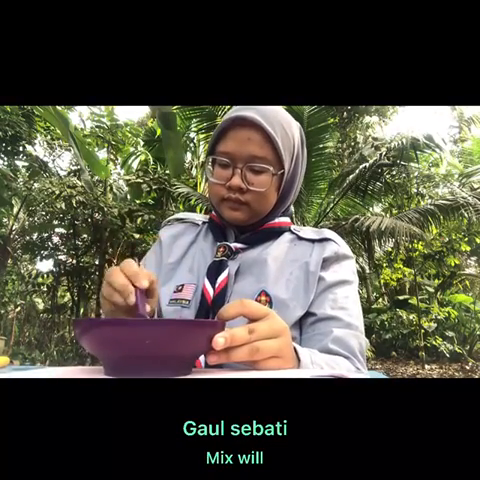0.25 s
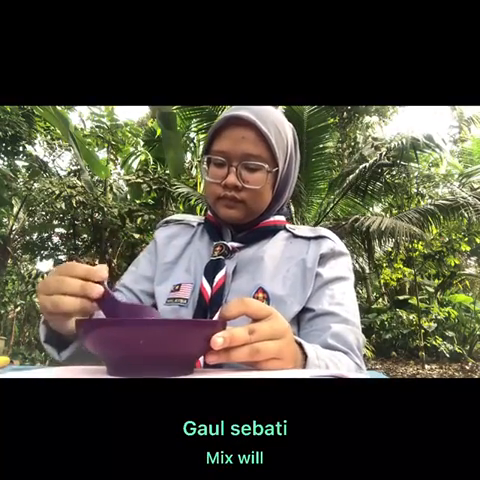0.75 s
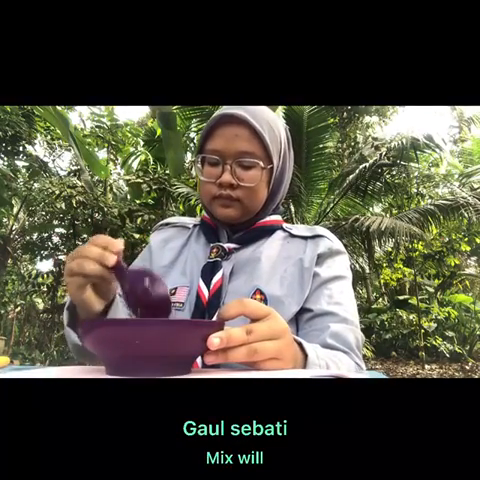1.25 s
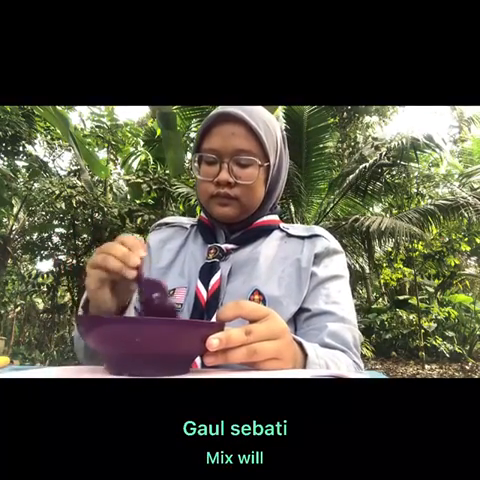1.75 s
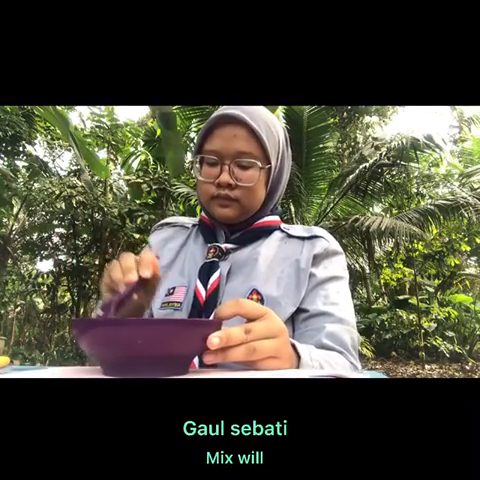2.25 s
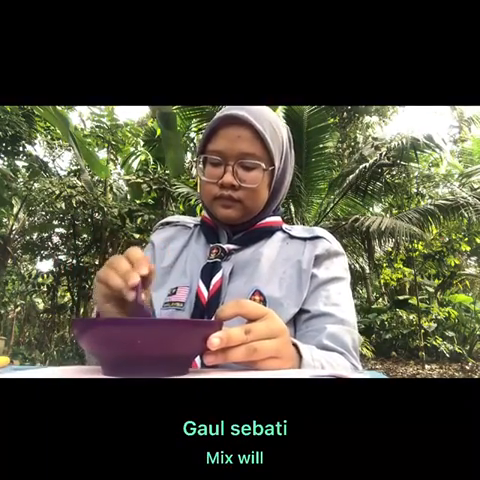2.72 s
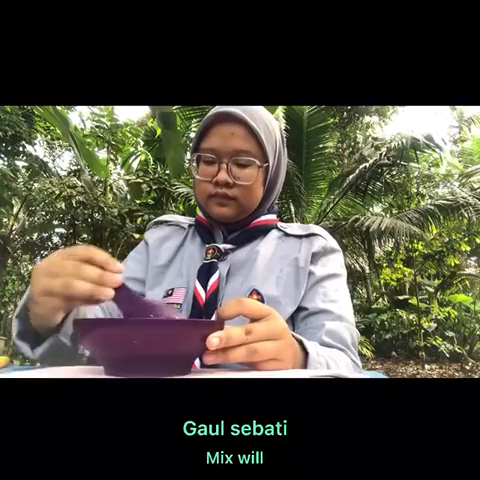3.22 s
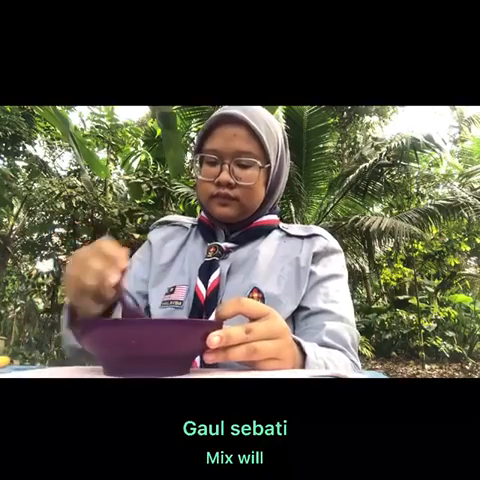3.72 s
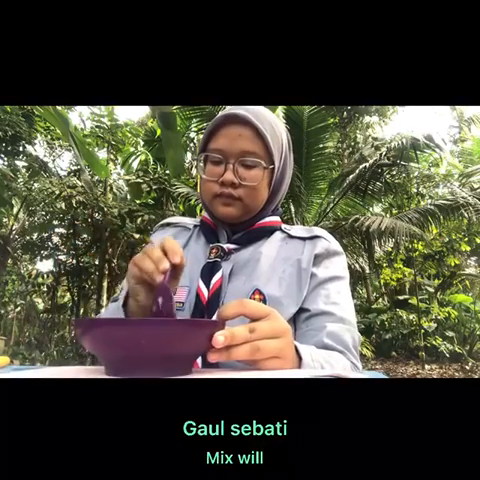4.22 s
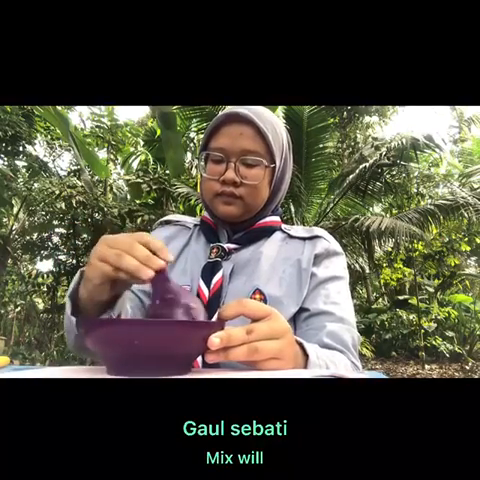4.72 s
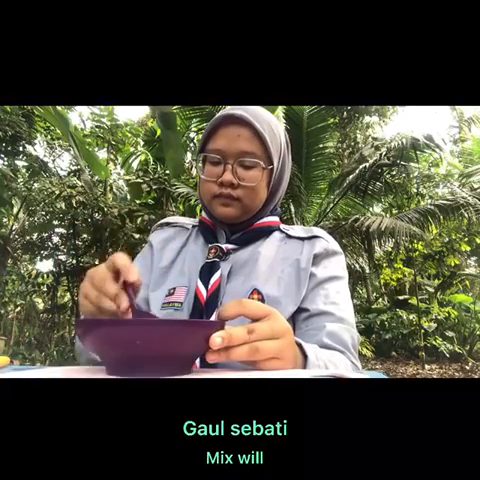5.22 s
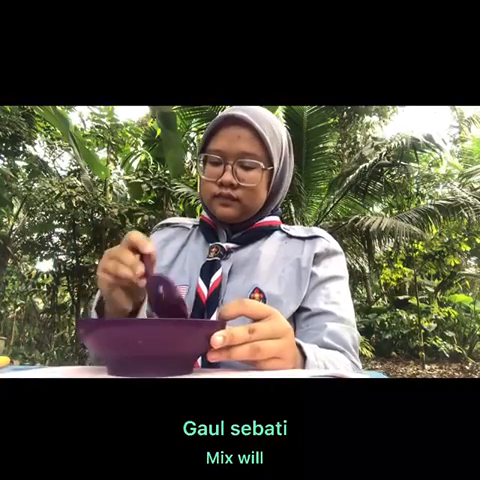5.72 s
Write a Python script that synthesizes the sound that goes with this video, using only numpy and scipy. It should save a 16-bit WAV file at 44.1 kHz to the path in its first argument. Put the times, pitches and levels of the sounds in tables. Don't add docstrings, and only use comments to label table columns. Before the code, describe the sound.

A plastic spoon stirs food in a plastic bowl outdoors with irregular hollow knocks, small clicks, short scrapes and soft table thuds.

```python
import sys
import numpy as np
from scipy import signal
from scipy.fft import rfft, irfft
from scipy.io import wavfile
from scipy.ndimage import uniform_filter1d

SR = 44100
rng = np.random.default_rng(int(sys.argv[2]) if len(sys.argv) > 2 else 0)


def materialize(psi):
    bounded = np.clip(np.atleast_2d(psi).T, -1, 1)
    quanta = np.round(bounded * 32767).astype(np.int16)
    wavfile.write(sys.argv[1], SR, quanta)


def natural_amplitude(level_db):
    exponent = np.asarray(level_db, float) / 20
    return 10 ** exponent


N = 263277

# frequency [Hz], level [dB], t60 [s].
HOLLOW = [(800, -13, .02), (980, -10, .02), (1145, 0, .04), (1260, -1, .035), (1420, -3, .03),
          (1620, -5, .02)]
WALL = [(2010, 2, 0.0045), (2290, 5, 0.0074), (2600, 4.9, 0.0081), (2897, 8.5, 0.007), (3340, 11, 0.0063),
        (3895, 4, 0.0091)]
RIM = [(4400, 3.5, 0.0079), (5270, 7, 0.0059), (6250, 8, 0.0041), (6870, 0, 0.0067), (7380, 0.5, 0.0066),
       (8320, -0.5, 0.0038)]
# frequency [Hz], level [dB], t60 [s].
TABLE = [(80.3, -28.5, 0.5), (116.7, -3.5, 0.072), (208, -2.5, 0.084), (253.8, 4, 0.081),
         (384.3, -0.5, 0.074), (461.4, -6.5, 0.053), (590.5, -11.5, 0.061), (760, -16, 0.038)]
# time [s], favoured hollow [Hz], favoured wall [Hz].
CONTACT = [(0.42, 1340, 2180), (0.55, 1280, 2750), (0.6, 1130, 3200), (0.64, 1200, 2850),
           (0.75, 1400, 2700), (1.86, 1220, 2820), (2.24, 1190, 2580), (2.98, 1400, 2600),
           (3.09, 1350, 2300), (3.13, 1234, 2730), (3.21, 1230, 2600), (4.62, 1150, 2620),
           (4.7, 1100, 2330), (4.8, 1150, 2200), (4.83, 1380, 2520), (5.42, 1350, 2100), (5.54, 1180, 2800),
           (5.93, 1360, 2320)]


def evened(x):
    return x / np.sqrt(np.mean(x ** 2) + 1e-20)


def add(mix, start_s, sound):
    part = mix[round(start_s * SR):][:len(sound)]
    part += sound[:len(part)]


def grit(per_s, spread_db):
    size = natural_amplitude(spread_db * np.minimum(rng.exponential(1, N), 4))
    hits = rng.random(N) < per_s / SR
    return evened(rng.standard_normal(N) * size * hits)


def ring(modes, detune=0.95, lift_db=0., crest_s=None, damping=0.99):
    hz, db, t60 = np.transpose(modes)[:, :, None]
    t = np.arange(SR // 6 if crest_s else SR // 20) / SR
    turn = 2 * np.pi * hz * np.reshape(detune, (-1, 1))
    if crest_s:
        wave = np.cos(turn * (t - crest_s)) * np.minimum(t / crest_s, 1) ** 0.64
    else:
        wave = np.sin(turn * t) * (1 - np.exp(-1.3 * hz * t)) ** 2
    return natural_amplitude(db + np.reshape(lift_db, (-1, 1)) - 60 * damping * t / t60) * wave


def shares(modes, focus_hz, reach):
    distance = np.log(np.array(modes)[:, :1] / focus_hz) / reach
    return .12 + np.exp(-distance ** 2)


def garden():
    # frequency [Hz], level [dB per Hz].
    floor = [(15, -24), (25, -6.5), (71, 10), (162, -19.5), (326, -19), (598, -13.5), (659, -11.5),
             (762, -16), (1100, -12), (1210, -12), (2620, -22), (3870, -18.5), (8200, -25), (10700, -99.5),
             (18000, -120)]
    # centre [Hz], width [Hz], level [dB].
    insects = [
        (7365, 750, 12),
        (3820, 200, 5.5),
    ]
    level_db, top_hz = -54.5, 8100
    frames, hz = N // 256 + 5, np.fft.rfftfreq(1024, 1 / SR)
    a, b, patches = rng.standard_normal((frames, 513, 3)).T
    patches = evened(uniform_filter1d(uniform_filter1d(patches, 10, 0), 16, 1))
    floor_hz, floor_db = np.transpose(floor)
    colour_db = np.interp(np.log(hz + 1), np.log(floor_hz + 1), floor_db)
    for centre_hz, width_hz, db in insects:
        colour_db += db * np.exp(-((hz - centre_hz) / width_hz) ** 2)
    colour_db -= 60 * np.clip((hz - top_hz) / 200, 0, 1)
    spectra = (a + 1j * b) * natural_amplitude(colour_db[:, None] + 1.9 * patches)
    return natural_amplitude(level_db) * evened(signal.istft(spectra, nperseg=1024, noverlap=768)[1][:N])


def bird():
    # time [s], pitch [Hz], level [dB].
    call = [
        (2.845, 1123, -80),
        (2.865, 1070, -74),
        (2.9, 1020, -77),
        (2.935, 1004, -73),
        (2.95, 990, -84),
    ]
    s, hz, db = np.transpose(call)
    t, out = np.arange(s[0], s[-1], 1 / SR), np.zeros(N)
    waver = 1 + .04 * evened(uniform_filter1d(rng.standard_normal(len(t)), 100))
    turn = 2 * np.pi * np.cumsum(np.interp(t, s, hz) * waver) / SR
    overtones = sum(natural_amplitude(part_db) * np.sin(k * turn) for k, part_db in enumerate([9, 14, 15, -2], 2))
    add(out, s[0], natural_amplitude(np.interp(t, s, db)) * overtones)
    return out


def crackle():
    bodies = ring(WALL + RIM, damping=0.98).sum(0)
    return natural_amplitude(-89) * signal.oaconvolve(grit(45, 2.8), bodies)[:N]


def jolts(lowest, crest_s):
    # crest [s], level [dB], depth of the lowest modes [dB].
    thuds = [(0.375, -28, -30), (0.468, -17, 3), (0.5517, -18.5, -6), (0.5618, -20.5, 0), (0.576, -35, 2),
             (0.6194, -25, 21), (0.8392, -29, 10), (1.701, -38, -10), (1.8254, -39, 2), (1.8332, -40, 0),
             (1.852, -20.5, 18), (1.8591, -38, 2), (1.868, -31, 5), (2.238, -17, 17), (2.392, -34.5, 14),
             (2.8438, -20, 14), (2.962, -18.5, 15), (3.269, -28, -22), (3.376, -35.5, -16),
             (3.529, -36, -7), (3.755, -27, 9), (3.844, -7, 4.5), (3.8566, -3, 10.5), (3.948, -21, 12),
             (4.304, -25, 31), (4.62, -16.5, 10.5), (4.8754, -17, 10), (5.129, -24.5, 20),
             (5.235, -26.5, -11), (5.4021, -14.5, 9), (5.407, -26, -5), (5.4191, -8.5, 11),
             (5.4297, -16, 2), (5.504, -20.5, 23), (5.5143, -32, 11), (5.52, -20.5, 15.5), (5.53, -26, 9),
             (5.6787, -18.5, 5.5), (5.687, -30, 5), (5.2, -30, 7), (5.8363, -32, 23)]
    out, chance = np.zeros(N), rng.standard_normal((len(thuds), 2, len(TABLE)))
    upper = np.array([hz > 420 for hz, db, t60 in TABLE])
    for (s, db, depth_db), (a, b) in zip(thuds, chance):
        lift_db = depth_db * lowest + 1.5 * max(db + 9.5, 0) * upper
        damping = 1 + 0.013 * max(db + 25, 0)
        jolt = ring(TABLE, 1 + .012 * a, 1.2 * b + lift_db, crest_s, damping).sum(0)
        add(out, s - crest_s, natural_amplitude(db) * jolt / jolt.max())
    return out


def shoves(lowest, crest_s):
    # crest [s], effort [dB], build-up [s], dying-away [s].
    efforts = [(0.341, -34, 0.069, 0.11), (.47, -26.5, 0.082, 0.029), (0.548, -35, 0.029, 0.04),
               (.72, -43, 0.55, 0.18), (0.841, -33, 0.18, 0.059), (1.691, -32.5, 0.046, 0.078),
               (1.784, -32.5, 0.07, 0.041), (1.85, -36, 0.13, 0.12), (1.981, -42.5, 0.14, 0.2),
               (2.24, -21, 0.025, 0.026), (2.85, -41.5, 0.083, 0.05), (2.959, -25, 0.039, 0.02),
               (3.289, -32, 0.37, 0.022), (3.383, -36.5, 0.19, 0.027), (3.54, -49.5, 0.11, 0.15),
               (3.77, -46, 0.17, 0.014), (3.855, -12, 0.024, 0.034), (3.959, -33, 0.056, 0.048),
               (4.199, -39.5, 0.26, 0.14), (4.3, -46, 0.12, .05), (1.56, -50, 0.23, 0.17),
               (2.57, -48.5, 0.14, 0.14), (3.05, -41.5, 0.077, 0.048), (4.441, -27.5, 0.087, 0.051),
               (4.62, -37, 0.15, 0.027), (4.849, -33, 0.6, 0.11), (5.128, -36, 0.046, 0.021),
               (5.228, -36, 0.23, 0.19), (5.425, -19, 0.048, 0.053), (5.5, -28, 0.0095, 0.14),
               (5.68, -25.5, 0.029, 0.016), (5.95, -45, 0.36, 0.12)]
    span_db, rest_db = 37, -61.5
    deep_rest_db, deep_follow = -59.5, 0.36
    t, effort_db = np.arange(N) / SR, np.full(N, rest_db)
    for s, db, rise_s, fall_s in efforts:
        away = np.maximum((s - t) / rise_s, (t - s) / fall_s)
        effort_db = np.maximum(effort_db, db - span_db * away)
    deep_db = deep_rest_db + deep_follow * (effort_db - rest_db)
    out, bodies = np.zeros(N), ring(TABLE, crest_s=crest_s)
    for group, db in ((~lowest, np.minimum(effort_db, -35)), (lowest, np.minimum(deep_db, -45))):
        body = bodies[group].sum(0)
        slips = grit(500, 1.0) * natural_amplitude(db)
        out += signal.oaconvolve(slips, body / np.linalg.norm(body))[:N]
    return out


def table():
    lowest = np.array([hz < 150 for hz, db, t60 in TABLE])
    crest_s = .0045
    highpass = signal.butter(2, 50, "high", fs=SR, output="sos")
    return signal.sosfiltfilt(highpass, jolts(lowest, crest_s) + shoves(lowest, crest_s))


def stir(start_s, length_s, crest, hollow_db, wall_db):
    ends_db, rim_db = -10.5, -2.5
    hollow_hz, wall_hz, smear, moist = 1440, 2660, 1.8, 1
    u = np.arange(0, length_s, 1 / SR) / length_s
    crest = np.clip(crest, .02, .98)
    db = hollow_db + ends_db * np.maximum(1 - u / crest, (u - crest) / (1 - crest))
    levels = natural_amplitude(db + np.array([[0], [wall_db], [wall_db + rim_db]]))
    return start_s, np.vstack([levels, np.outer([hollow_hz, wall_hz, smear, moist], np.ones(len(u)))])


def spoon(start_s, length_s, hollow_db, wall_db, rim_db, rise_s, stop_s, drift_db, smear):
    ends_db = -9
    t = np.arange(0, length_s, 1 / SR)
    u = t / length_s
    edge_db = ends_db * (np.clip(1 - t / rise_s, 0, 1) + np.clip(1 - (length_s - t) / stop_s, 0, 1))
    db = hollow_db + edge_db + np.array([[0], [wall_db], [rim_db]]) + np.outer(drift_db, u)
    s, *favoured = np.transpose(CONTACT)
    hz = [np.interp(start_s + t, s, path) for path in favoured]
    return start_s, np.vstack([natural_amplitude(db), hz, smear + 0 * u, 0 * u])


def motions():
    # start [s], length [s], crest position [share], hollow [dB],
    # wall against hollow [dB].
    stirs = [(0.137, 0.27, 0.85, -48, -6), (0.76, 0.14, 0.53, -47.5, -5.5), (1.436, 0.19, 0.74, -53.5, 0.5),
             (1.659, 0.073, 0.61, -47.5, -4.5), (1.748, 0.16, .1, -52, -12), (1.907, 0.14, 0.07, -47.5, -3),
             (2.283, 0.13, 0.045, -55, 0.5), (2.523, 0.21, 0.058, -53.5, -3), (2.682, 0.1, 0.78, -54.5, -2),
             (3.215, 0.21, 0.2, -46.5, -1), (3.406, 0.36, 0.12, -56, -4.5), (3.679, 0.14, 0.53, -53, -0.5),
             (3.982, 0.23, 0.39, -52.5, 0.5), (4.255, 0.09, 0.49, -51.5, 0), (4.4, 0.058, 0.5, -42, -5.5),
             (4.84, 0.2, 0.041, -56, 0.5), (5.1, 0.22, 0.36, -46, -3.5), (5.794, 0.098, 0.12, -52.5, 0.5)]
    # start [s], length [s], hollow [dB], wall and rim against hollow [dB].
    sweeps = [
        (0.49, 0.073, -52.5, -3, -20),
        (3.094, 0.044, -48, 5, -8),
        (4.697, 0.11, -31.5, -2.5, -9.5),
        (4.772, 0.079, -31, -4.5, -14.5),
        (5.899, 0.082, -47, 0, -4),
    ]
    skids = [(2.979, 0.029, -38, 13, -12), (5.499, 0.039, -46.5, 3, -5), (2.6, 0.01, -37.5, -1, -5.5),
             (0.715, 0.061, -41.5, 3, -18), (1.861, 0.044, -40.5, 5.5, -3), (2.235, 0.065, -38.5, 6, -9),
             (4.617, 0.095, -32.5, 8, 1.5), (5.578, 0.036, -43, 3, -4), (5.414, 0.02, -29, -12, -32)]
    rubs = [(0.614, 0.13, -35, -3, -16), (3.12, 0.095, -33.5, 0, -16), (4.636, 0.048, -30.5, 5.5, -3.5),
            (4.664, 0.059, -33, -3, -9), (5.527, 0.032, -31, -1.5, -11), (3.186, 0.045, -36, 0, -13),
            (5.913, 0.042, -40.5, -8, -12)]
    drags = [
        (0.55, 0.0664, -27.5, 0.5, -6),
    ]
    squeals = [
        (3.942, 0.011, -38, 15, 3),
        (3.951, 0.021, -39, 18.5, 2),
    ]
    scrubs = [
        (0.43, 0.046, -38.5, -9, -26),
        (2.996, 0.098, -45, 8.5, -10),
        (4.82, 0.024, -32, 2, -12),
        (5.557, 0.02, -27.5, -4, -9),
        (5.394, 0.02, -25.5, -11, -22.5),
    ]
    # 1 = clean edge, 3 = smeared by food; drift_db of hollow, wall, rim from start to end
    kinds = [
        (sweeps, dict(rise_s=0.018, stop_s=0.03, drift_db=(-2.5, -3, 1.5), smear=2.35)),
        (skids, dict(rise_s=0.0011, stop_s=0.033, drift_db=(-7.5, -9, 1.5), smear=1.94)),
        (rubs, dict(rise_s=0.013, stop_s=0.024, drift_db=(-2, -0.5, 10), smear=0.98)),
        (drags, dict(rise_s=0.0041, stop_s=0.004, drift_db=(-27, -6, -3.5), smear=1.55)),
        (squeals, dict(rise_s=0.0023, stop_s=0.012, drift_db=(-4, -6, -3), smear=0.66)),
        (scrubs, dict(rise_s=0.0063, stop_s=0.0044, drift_db=(-1.5, 0, 1), smear=1.78))]
    moves = [stir(*row) for row in stirs]
    for rows, shape in kinds:
        moves += [spoon(*row, **shape) for row in rows]
    state = np.ones((7, N)) * [[0], [0], [0], [1200], [2600], [1], [0]]
    for start_s, move in moves:
        part = state[:, round(start_s * SR):][:, :move.shape[1]]
        move = move[:, :part.shape[1]]
        part[:] = np.where(move[:3].sum(0) > part[:3].sum(0), move, part)
    return state


def foot(hollow_gain, smear):
    body = ring(TABLE[-3:], lift_db=[0, 2, 9], damping=3.0).sum(0)
    press = natural_amplitude(-9) * hollow_gain * np.maximum(smear - 1, 0) * grit(1500, 1.6)
    return signal.oaconvolve(press, body / np.linalg.norm(body))[:N]


def strokes():
    *gains, hollow_hz, wall_hz, smear, moist = motions()
    flutter = natural_amplitude(1.2 * evened(uniform_filter1d(rng.standard_normal(N), 300)))
    gains = uniform_filter1d(np.array(gains), 60, axis=1) * flutter
    pops = .35 * grit(160, 2) * moist
    out = np.zeros(N)
    groups = ((HOLLOW, hollow_hz, .11, 1.8), (WALL, wall_hz, .11, .9), (RIM, 5200, .5, 1.2))
    for gain, (modes, focus_hz, reach, damping) in zip(gains, groups):
        bodies = ring(modes, 0.98, damping=damping)
        energy = (bodies ** 2).sum(1)[:, None]
        wander = uniform_filter1d(uniform_filter1d(rng.standard_normal(N), 900), 900)
        stray = 1 + 0.03 * smear * evened(wander)
        share = shares(modes, focus_hz * stray, reach * smear) * energy ** -.3
        share /= np.sqrt((share ** 2 * energy).sum(0))
        patches = uniform_filter1d(rng.standard_normal(share.shape), 400, axis=1)
        share *= natural_amplitude(1.4 * evened(patches))
        slips = share * gain * (grit(16000, 1.6) + pops)
        out += signal.oaconvolve(slips, bodies, axes=1)[:, :N].sum(0)
    return out + foot(gains[0], smear)


def rattled(noise):
    t = np.arange(len(noise)) / SR
    blow = 0.22 * noise * np.exp(-t / 0.0017)
    blow[0] = 1
    tones = rfft(blow, 2 * len(t))
    return irfft(tones / (abs(tones) + .15) ** .95)[:len(t)]


def taps():
    # time [s], hollow peak [dB], wall and rim against hollow [dB], loudest wall [Hz].
    knocks = [(0.544, -9.5, -4.5, -3.5, 3000), (0.5478, -15.5, -8, -12, 2200), (0.5508, -22, -8, -15, 2600),
              (0.5565, -22, -4, -11, 2800), (0.5694, -30, 6, 2, 2900), (0.608, -36, 10, -5, 2220),
              (4.63, -32, 2, -7, 2600), (1.838, -30.5, -10, -26, 1970), (1.844, -39, 9, -18, 2440),
              (1.859, -32, -3, 3.5, 2680), (1.8642, -39.5, 2, 9.5, 2800), (1.876, -41, 3, -4, 3000),
              (2.227, -28.5, 12, 13, 2150), (2.231, -14.5, 7, -4.5, 2980), (2.834, -35, -3, -26, 2000),
              (2.946, -35, 1, -37, 1900), (2.959, -25.5, 9, 6.5, 2530), (2.965, -38, 19, 17, 2090),
              (3.268, -33, 4.5, -7, 2180), (3.837, -11.5, -9, -18.5, 2250), (3.8485, -13, 4, -7, 2050),
              (3.9395, -17, 12, 7, 2800), (4.439, -38, 6, -21, 2270), (4.612, -18.5, 2, 0, 2440),
              (4.866, -30, -9, -51, 1840), (5.103, -42, 3, -15, 2210), (5.177, -35, -21, -3.5, 2420),
              (5.311, -36.5, 3.5, 1, 2120), (5.395, -28, -2, -9, 2290), (5.4123, -14, 3, -45, 2400),
              (5.42, -26, -9, -45, 2000), (3.858, -38, 4, -30, 2200), (4.6473, -29, 9.5, -2, 2600),
              (4.822, -29, 4, -11, 2850), (5.5407, -39, 5, -5, 2750), (5.496, -31.5, 5, 6, 2730),
              (5.528, -28, -7, -18, 2680)]
    # time [s], hollow peak [dB], wall and rim against hollow
    # [dB].
    ticks = [(0.212, -43, 7.5, 6.5), (1.446, -55, -3, 15), (1.459, -52, 10.5, 15), (1.494, -45.5, 5, 9),
             (1.676, -50, 10, -11), (1.689, -49.5, 9, -10), (1.884, -38, 6, -6), (1.963, -46, 10, 11),
             (2.051, -53.5, 14, 15.5), (2.359, -52, 13.5, -8), (2.736, -43.5, 2, -16), (2.761, -48, 13, 13),
             (3.338, -49.5, -1, 13.5), (3.547, -46, 4, 7.5), (3.617, -47, -5, 9), (4.059, -52, 13, 5),
             (4.0694, -49, 12.5, 10), (4.102, -45, 9, 3), (4.1253, -55, 6, -7), (4.2454, -54, 13.5, 15.5),
             (4.2873, -49, -5, 13.5), (4.3472, -51.5, 14, 4), (4.417, -51, 0, -8), (2.421, -52.5, 9.5, 12),
             (1.905, -48, 3, 2), (1.9317, -41, -1, 3), (0.5895, -37, 15, 0), (0.61, -44, 17.5, -6),
             (0.4368, -35, -11, -18), (0.4607, -34, -8, -22), (4.7375, -28, -1, -10), (5.301, -53, 10, 0),
             (3.712, -47, 5.5, 10), (5.11, -41, 5.5, -7), (5.3452, -46.5, 9.5, 7), (5.623, -40.5, 2.5, 7),
             (5.629, -44, 4, 7.5), (5.806, -44.5, 2.5, -22), (5.857, -50, -1, 11),
             (0.975, -59, 12, 0), (1.16, -61, 6, 15), (1.225, -56, 13, 8), (1.58, -50, 8, 0),
              (3.365, -55, 4, 14), (3.476, -63, 2, 12), (3.785, -51, 9, 11), (4.925, -55, 6, 13),
              (5.166, -55, 4, 16), (5.672, -43.5, 1, -15), (5.77, -57, 9, 10), (5.798, -52, 7, 9),
              (5.827, -45, 2, -8), (5.196, -48, 0, -12), (5.286, -47, 3, 4), (3.2437, -38, -3, -15),
              (5.95, -43, 3, -15)]
    blows = knocks + [(*tick, 3000) for tick in ticks]
    cushion = signal.butter(8, 2980, fs=SR, output="sos")
    out, chance = np.zeros(N), rng.standard_normal((len(blows), 3, 2, 6))
    for (s, hollow_db, wall_db, rim_db, wall_hz), luck in zip(blows, chance):
        blow = rattled(rng.standard_normal(220))
        damping = 1.5 + 0.0092 * max(-47.5 - hollow_db, 0)
        if rim_db < -16:
            damping *= 1.33
        hollow_hz = np.interp(s, *np.transpose(CONTACT)[:2])
        # modes, level dB, favoured Hz, reach, damping by the hand
        groups = ((HOLLOW, 0, hollow_hz, .2, 1.6), (WALL, wall_db + 2.0, wall_hz, .22, 1.3),
                  (RIM, rim_db, 6000, .4, 1.3))
        for (modes, db, focus_hz, reach, held), (a, b) in zip(groups, luck):
            place_db = 20 * np.log10(shares(modes, focus_hz, reach)[:, 0]) + 1.5 * b
            place_db -= 0.19 * np.array(modes)[:, 1]
            bodies = ring(modes, 1 + .02 * a, place_db, damping=damping * held)
            sound = np.convolve(blow, bodies.sum(0))
            if rim_db < -26:
                sound = signal.sosfilt(cushion, sound)
            add(out, s, natural_amplitude(hollow_db + db) * sound / abs(sound).max())
    return out


def scene():
    return (garden() + bird() + crackle() + table() + strokes() + taps())[None]


def low_pass(x):
    return signal.sosfilt(signal.butter(12, 9730, fs=SR, output="sos"), x)


def record(dry):
    ceiling, edge_hz = .62, 9040
    squeezed = ceiling * np.tanh(dry / ceiling)
    lowpass = signal.firwin(255, edge_hz, window=("kaiser", 9), fs=SR)
    return low_pass(signal.oaconvolve(squeezed, lowpass[None], "same"))


dry = scene()
out = record(dry)
materialize(out)
```